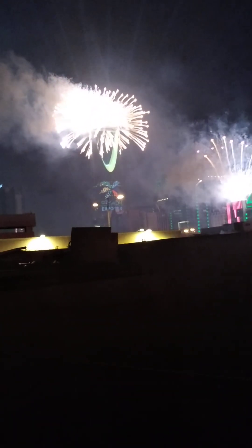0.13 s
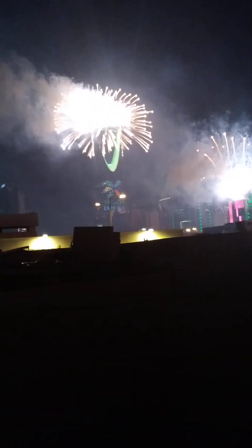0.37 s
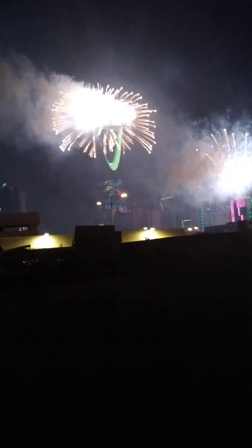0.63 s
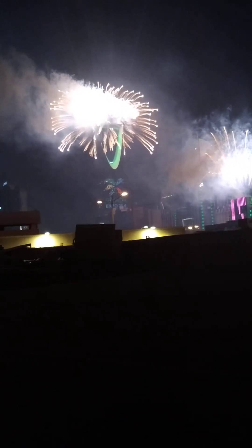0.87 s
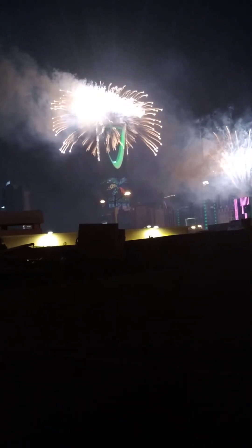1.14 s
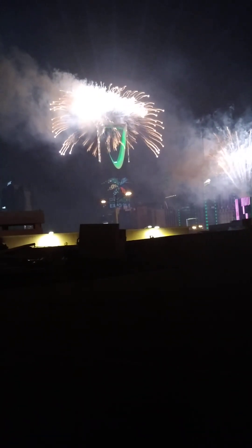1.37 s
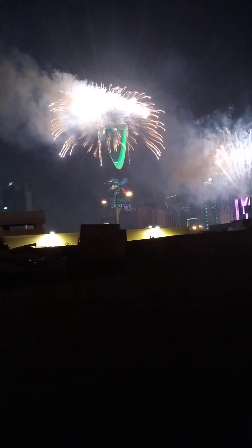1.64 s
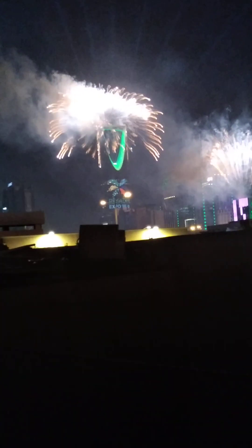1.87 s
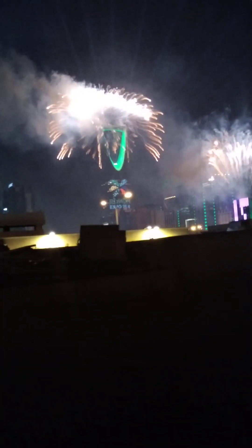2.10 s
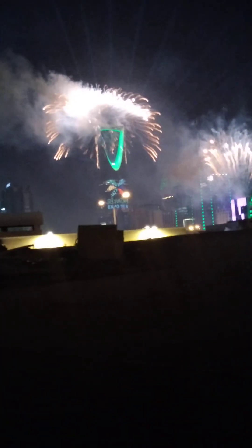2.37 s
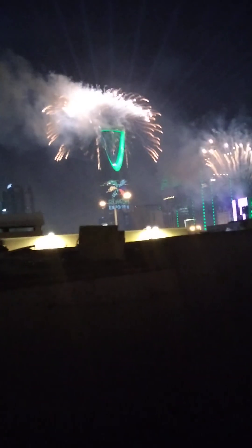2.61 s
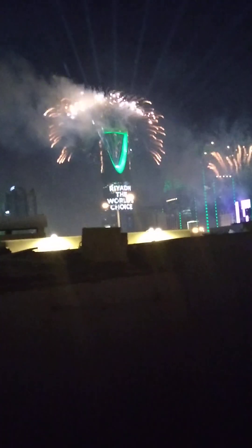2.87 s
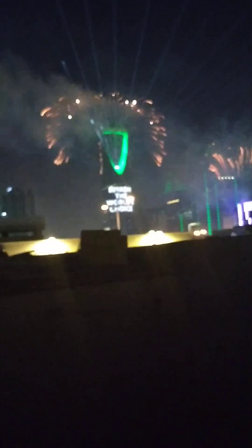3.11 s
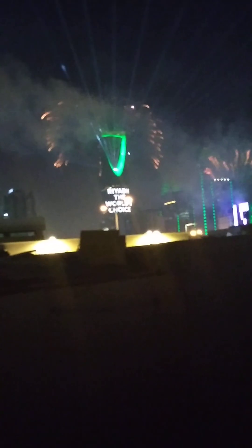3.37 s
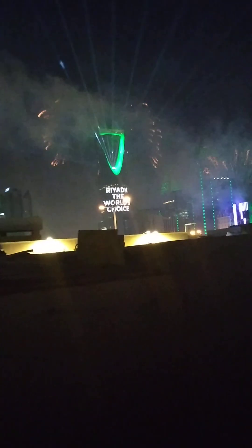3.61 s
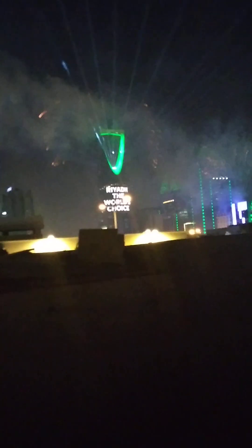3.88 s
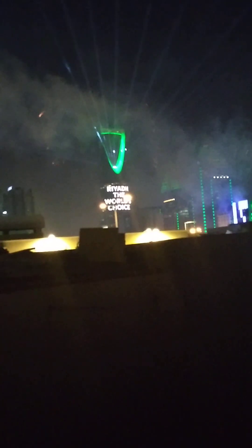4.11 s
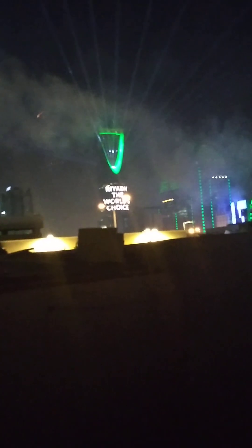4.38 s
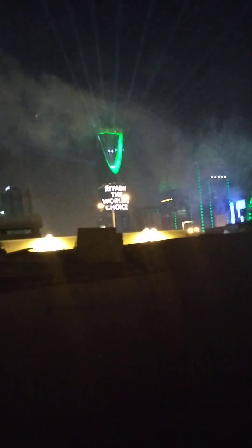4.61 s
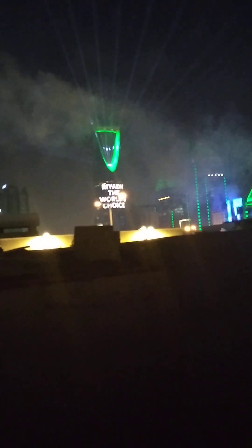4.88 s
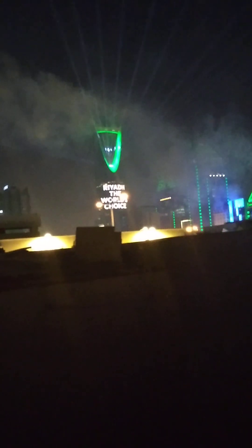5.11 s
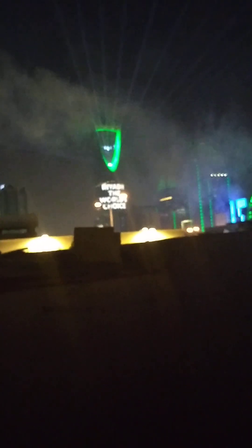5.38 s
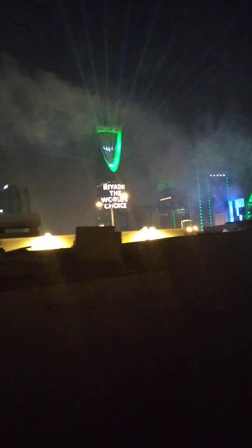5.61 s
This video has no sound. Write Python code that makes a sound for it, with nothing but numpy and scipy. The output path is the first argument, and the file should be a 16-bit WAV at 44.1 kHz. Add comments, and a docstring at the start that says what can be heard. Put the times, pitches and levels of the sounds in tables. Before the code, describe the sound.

Fireworks far away at night, heard by a stereo phone on a walled terrace above a city. From 0 s there is low rumble, faint patter and fine crackle; from about 0.35 s dull separate pops multiply. Between 1.0 and 1.4 s they merge into the loudest barrage, with deep bass thuds around 1.15 s and dry mid-pitched crackles. Strong irregular bursts continue until 2.0 s, then fall away to decaying rumble. A smaller volley rattles at 2.8-2.95 s, trailing sparse pops and crackle to about 3.4 s. At 3.65 s one tight, sharp bang lands, followed by low wall echoes. Afterwards the rumble fades into steady low traffic hum with sparse weak patter; a vehicle's broad tyre roar swells and peaks near 5.3 s. Treble is softened by distance, buildings give short diffuse echoes, thin microphone hiss stays throughout, and tiny close clicks occur near 0.2, 0.9 and 1.65 s.

```python
"""A walled roof terrace above a city at night: a phone hears a far fireworks display over the city's hum.
Each shell is one short pressure wave, dulled by a long way through the air. Volleys of small shells blur
into a rolling rumble; clusters of short rings make the crackle. Delayed copies stand for the terrace walls,
a decaying noise tail for far buildings; shaped noise makes boom, traffic, a passing vehicle and mic hiss."""
import sys
import numpy as np
from scipy import signal
from scipy.fft import rfft, irfft, next_fast_len
from scipy.io import wavfile
from scipy.ndimage import uniform_filter1d, map_coordinates

SR = 44100
rng = np.random.default_rng(int(sys.argv[2]) if len(sys.argv) > 2 else 0)


def waveform_to_disk(signal):
    """Save audio, clipped to [-1, 1], as 16-bit WAV at the path in sys.argv[1]."""
    frames = np.transpose(np.atleast_2d(signal))
    scaled = np.clip(frames, -1, 1) * 32767
    samples = np.round(scaled).astype(np.int16)
    wavfile.write(sys.argv[1], SR, samples)


def natural_amplitude(level_db):
    """Convert a level in decibels to a linear amplitude factor, elementwise."""
    exponent = np.asarray(level_db, float) / 20
    return 10 ** exponent


N = 253126
TIME_S = np.arange(N) / SR


def unit(x):
    """Scaled to rms 1."""
    return x / np.sqrt(np.mean(x ** 2) + 1e-20)


def along(points, hz):
    """Values of (f/Hz, value) points, interpolated on a log frequency axis."""
    f, v = np.transpose(points)
    return np.interp(np.log(hz + 1), np.log(f + 1), v)


def wobble(knots_per_s):
    """Smooth random curve through normally distributed knots."""
    knots = rng.standard_normal(int(N * knots_per_s / SR) + 4)
    return map_coordinates(knots, [np.arange(N) * knots_per_s / SR])


def hump(middle_s, half_s):
    """Gaussian swell, down to 1/e at half_s from its middle."""
    return np.exp(-((TIME_S - middle_s) / half_s) ** 2)


def filtered(x, response):
    """x times a complex frequency response; mirrored ends keep the edges free of clicks."""
    edge = SR // 4
    x = np.pad(x, [(0, 0)] * (x.ndim - 1) + [(edge, edge)], mode="reflect")
    m = next_fast_len(x.shape[-1])
    y = irfft(rfft(x, m) * response(np.fft.rfftfreq(m, 1 / SR)), m)
    return y[..., edge:edge + N]


def coloured(x, spectrum):
    """x through a (f/Hz, gain/dB) spectrum."""
    return filtered(x, lambda hz: natural_amplitude(along(spectrum, hz)))


def noise(spectrum):
    """Two unrelated channels of Gaussian noise through a spectrum."""
    return coloured(rng.standard_normal((2, N)), spectrum)


def spread(pair):
    """Two unrelated signals mixed so that the ports' likeness varies with frequency."""
    # left-right likeness: f/Hz, correlation
    alike = [(60, 0.99), (130, 0.97), (270, 0.96), (580, 0.79), (1220, 0.43), (2600, 0.14), (4500, 0.42)]

    def mid_side(hz):
        turn = np.arccos(np.clip(along(alike, hz), -1, 1)) / 2
        return np.array([np.cos(turn), np.sin(turn)])

    mid, side = filtered(pair, mid_side)
    return np.array([mid + side, mid - side])


def placed(s, shapes):
    """Rows of shapes summed, each centred on its time."""
    size = shapes.shape[1]
    at = np.round(s * SR).astype(int)[:, None] + np.arange(size)
    return np.bincount(at.ravel(), shapes.ravel(), N + 2 * size)[size // 2:size // 2 + N]


def waves(s, db, ms):
    """Pressure waves: a push, then a slightly deeper pull, about ms apart."""
    u = np.arange(-256, 256) / SR * 2000 / ms[:, None]
    return placed(s, -natural_amplitude(db)[:, None] * (u + 0.07) * np.exp(.5 - u * u / 2))


def rings(s, db, hz, ms, size=256):
    """Gaussian bursts of a few cycles, each with a random phase; ms: half length to 1/e."""
    t = np.arange(-size, size) / SR
    phase = 2 * np.pi * (hz[:, None] * t + rng.random((len(s), 1)))
    return placed(s, natural_amplitude(db)[:, None] * np.exp(-(t * 1000 / ms) ** 2) * np.sin(phase))


def shells():
    """Each wave comes weak and thin by the shorter way, then strong with a steep front."""
    # loudest shells, ahead of the air path: t/s, level/dB, push-to-pull time/ms
    bursts = [(0.3576, -19, 0.81), (0.4347, -16, 0.95), (0.5284, -13, 0.87), (0.5924, -15.5, 0.92),
              (.6666, -24, 0.74), (0.671, -18, 0.6), (0.6738, -15, 1), (0.6846, -23, 0.85),
              (.7, -28.5, 1.6), (0.7195, -22, 0.92), (0.7232, -17.5, 1.7), (0.776, -13, 1.06),
              (.815, -23.5, 1), (.8395, -19.5, .8), (0.842, -12.5, 0.76), (0.8804, -30, 1.7),
              (0.886, -20, 1.6), (0.9197, -15, 0.98), (0.9225, -15, 0.63), (0.9472, -21.5, 1.5),
              (.9505, -15, 0.81), (.9567, -16, 0.71), (.9652, -21, 1), (.974, -17.5, 1.5),
              (.998, -21.5, 1.6), (1.015, -10, 0.86), (1.0239, -13.5, 0.97), (1.039, -16, 1.2),
              (1.0446, -14.5, 0.89), (1.0484, -12.5, 0.82), (1.0512, -13.5, 0.89), (1.0542, -8, 0.62),
              (1.056, -17.5, 0.66), (1.0632, -21.5, 0.94), (1.0688, -14, 2.1), (1.0725, -21, 1.8),
              (1.0761, -16.5, 1.2), (1.089, -20.5, 1.1), (1.093, -16, 0.46), (1.103, -20, 0.81),
              (1.1115, -18, 0.9), (1.1212, -15.5, 1.2), (1.1312, -16, 0.51), (1.1324, -14.5, 0.8),
              (1.1397, -10, 0.87), (1.1504, -20.5, 0.62), (1.163, -20.5, 1), (1.1713, -18.5, 1.8),
              (1.181, -14.5, .88), (1.1864, -17.5, 2.2), (1.197, -21.5, 1.3), (1.218, -14.5, 0.79),
              (1.2205, -17.5, .8), (1.2427, -20.5, 0.5), (1.2501, -12.5, 0.78), (1.2586, -21, 2.1),
              (1.3164, -17, .7), (1.3233, -10, 0.7), (1.3669, -9.5, 0.77), (1.3613, -23, 0.79),
              (1.377, -22, 1.2), (1.3875, -16.5, 0.56), (1.3944, -13, 0.71), (1.428, -27.5, 2),
              (1.4555, -17, 1), (1.4597, -24, 1.2), (1.4957, -25, 1.6), (1.5, -14, 0.79),
              (1.5127, -28, .95), (1.5186, -24, 0.81), (1.5386, -16, 0.6), (1.5458, -25, 3.2),
              (1.5916, -21.5, 1.3), (1.6426, -25, 1.6), (1.635, -24, 1.2), (1.6643, -19, 1.3),
              (1.6685, -24, 1), (1.69, -17.5, 0.92), (1.6973, -15, .87), (1.7575, -17.5, 0.94),
              (1.7945, -12.5, 1.2), (1.8073, -25.5, 1.3), (1.8133, -26.5, 1.6), (1.8504, -15, 1.0),
              (1.853, -17, 1.35), (1.8667, -18, 0.57), (1.8771, -18, 0.67), (1.8848, -20.5, 1.1),
              (1.899, -27, 1.7), (1.9161, -20.5, 1.7), (1.9399, -17, 1.04), (1.9746, -16, 1.5),
              (2.004, -27.5, 1.1), (2.022, -37, 1.5), (2.7965, -23.5, 1.3), (2.7981, -20.5, 1.1),
              (2.8062, -26.5, 1.5), (2.8167, -18, 1.1), (2.8287, -20.5, 0.82), (2.8342, -24, 1),
              (2.8365, -16, 1.23), (2.8433, -32, 1.4), (2.8528, -22, 1.5), (2.8664, -20.5, 1.3),
              (2.8696, -16.5, 1.2), (2.875, -27, 1.8), (2.8808, -21, 0.72), (2.8835, -24.5, 0.98),
              (2.8941, -23, 2), (2.901, -23.5, 1.1), (2.9147, -35, 1.5), (2.9306, -24, 1.1),
              (2.9332, -16, 1.35), (2.9683, -32, 1.3), (2.9781, -24, 1.7), (3.021, -25, 0.65),
              (3.051, -29, 1.2), (3.062, -34, 0.53), (3.095, -26, 0.73), (3.117, -26.5, 1.9),
              (3.205, -30.5, 1.2), (3.2218, -23.5, 1.6), (3.253, -28.5, .8), (3.309, -35.5, 1.1),
              (3.362, -32, 0.89), (3.653, -24.5, 1), (3.642, -29, 0.61), (3.6456, -28, 1.6),
              (3.6549, -22.5, 1.7), (3.657, -29.5, 2.2), (3.662, -15.5, 1.3), (3.6607, -20, 0.83),
              (3.666, -18, 2.7), (3.6669, -20.5, 0.63), (3.6713, -17.5, 0.73), (3.6735, -20.5, 1.5),
              (3.6757, -19.5, 0.64), (3.679, -23.5, 2.3), (3.683, -25.5, 1.3), (3.695, -33, 2.2),
              (3.7572, -31, 0.87), (3.7719, -30.5, 1.9)]
    s, db, ms = np.transpose(bursts)
    early_lead_s, early_db, early_thin = 0.00702, -17, 0.52  # level re main wave, wave time share
    front_db, front_thin = -12.5, 0.5
    early = waves(s - early_lead_s, db + early_db, early_thin * ms)
    front = waves(s - ms / 2000, db + front_db, front_thin * ms)
    return waves(s, db, ms) + early + front


def salvo(count=54):
    """Waves packed so close that they merge into one bang; the middle ones tend to be largest and longest."""
    # one salvo: first t/s, fullest t/s, last t/s
    span = (3.639, 3.664, 3.693)
    first, fullest, last = span
    draw = rng.random((count, 3))
    s = first + (last - first) * (np.arange(count) + draw[:, 0]) / count
    swell = np.interp(s, [first, fullest, last], [.3, 1, .3])
    ms = 0.22 * (2.8 + 3.1 * swell) ** draw[:, 2]
    top_db = -25
    return waves(s, top_db + 20 * np.log10(swell) - 5 * draw[:, 1], ms)


def barrage_db():
    """Level curve of the small shells' fire, interpolated in dB."""
    # patter of small shells, ahead of the air path: t/s, level/dB
    barrage = [(0, -41.5), (.45, -37.5), (.98, -35), (1.05, -32), (1.25, -31), (1.35, -33), (1.97, -32),
               (2.06, -41), (2.25, -41.5), (2.55, -48), (2.785, -41), (2.8, -34), (2.92, -39.5), (3.1, -38),
               (3.25, -44), (3.63, -41), (3.67, -31), (3.7, -43.5), (3.77, -42.5), (3.9, -43), (4.6, -53.5),
               (5.1, -43.5), (5.45, -43), (5.74, -42.5)]
    s, db = np.transpose(barrage)
    return np.interp(TIME_S, s, db)


def patter(level_db, count=2200):
    """Small shells: waves at random moments, a few much larger than the rest."""
    draw = rng.random((count, 3))
    db = -2.5 * np.log(1 - draw[:, 1])
    ms = 0.95 * (0.57 + 1.18 * draw[:, 2])
    return natural_amplitude(level_db) * unit(waves(draw[:, 0] * N / SR, db, ms))


def cracks(count=5):
    """Bursting stars: each crack is a quick cluster of snaps, scattered in time, pitch and size."""
    # clearest cracks: t/s, level/dB (a snap's mean is lower, below), f/Hz
    bursting_stars = [(0.253, -29.5, 1120), (0.263, -35.5, 2330), (.331, -34.5, 1010), (0.358, -28.5, 1490),
                      (.362, -36.5, 2160), (.437, -38.5, 1150), (.459, -33.5, 2120), (.464, -29.5, 2110),
                      (.528, -35, 1940), (.562, -34, 2000), (0.579, -35.5, 1230), (.58, -44, 1960),
                      (.621, -36, 2370), (0.638, -33, 1380), (0.673, -31, 1380), (0.773, -41, 1090),
                      (.722, -35, 1640), (.841, -38, 2130), (0.844, -32.5, 1550), (0.886, -30, 1390),
                      (.922, -24, 1215), (.982, -34.5, 1920), (1.024, -32, 1470), (1.04, -26.5, 1210),
                      (1.056, -32, 804), (1.056, -39, 2480), (1.095, -30, 1580), (1.133, -20, 1180),
                      (1.182, -32, 2100), (1.181, -23, 1250), (1.219, -23.5, 1150), (1.244, -28, 1210),
                      (1.111, -35, 1500), (1.15, -37.5, 1390), (1.244, -39, 1990), (1.282, -33, 2000),
                      (1.352, -40.5, 1920), (1.39, -39, 2010), (1.479, -38, 2300), (1.538, -37, 1800),
                      (1.332, -26, 1200), (1.422, -32.5, 1530), (1.477, -31, 1420), (1.498, -24.5, 1370),
                      (1.523, -25, 1240), (1.592, -30, 1180), (1.61, -33.5, 1550), (1.664, -40, 1920),
                      (1.695, -27.5, 1350), (1.854, -30.5, 1290), (1.866, -32, 1390), (1.885, -31, 1220),
                      (1.897, -32, 1230), (1.911, -35, 2030), (1.917, -41, 2030), (1.941, -37, 1410),
                      (1.975, -38, 1420), (2.003, -40, 1500), (2.794, -33, 1500), (2.794, -42, 2090),
                      (2.818, -40, 1400), (2.849, -42, 1300), (2.884, -37, 1400), (2.9, -34.5, 1300),
                      (2.836, -28, 1270), (2.874, -30.5, 1330), (2.932, -26, 1440), (2.9, -29, 850),
                      (2.955, -35.5, 950), (3.02, -39, 1950), (3.024, -35, 1310), (3.065, -37, 1500),
                      (3.094, -34, 1300), (3.094, -33, 820), (3.262, -41, 1400), (3.31, -39, 1250),
                      (3.654, -35, 1200), (3.665, -31, 1410), (3.673, -35, 1950), (3.364, -35, 1220),
                      (3.054, -45, 1880), (3.25, -32, 1220), (3.309, -41.5, 1880), (5.378, -33, 1050)]
    s, db, hz = (np.repeat(column, count) for column in np.transpose(bursting_stars))
    span_s, pitch_scatter, snap_db, snap_scatter_db, snap_ms = .0025, 0.058, -5, 1.67, 1.63
    draw = rng.standard_normal((len(s), 3))
    s = s + span_s * draw[:, 0]
    hz = hz * np.exp(pitch_scatter * draw[:, 1])
    return rings(s, db + snap_db + snap_scatter_db * draw[:, 2], hz, snap_ms)


def stars(count=6000):
    """Random crackle of rms 1: short rings at 700-3500 Hz, a few much larger than the rest."""
    # crackle colour: f/Hz, gain/dB
    crackle_colour = [(300, -120), (700, -20), (1200, 3), (1600, -9.5), (2000, -1), (2500, -6),
                      (2800, -15.5), (3500, -14), (4200, -30.5), (5000, -120)]
    draw = rng.random((count, 3))
    db = -1.64 * np.log(1 - draw[:, 1])
    grains = rings(draw[:, 0] * N / SR, db, 700 * 5 ** draw[:, 2], ms=0.91)
    return unit(coloured(grains, crackle_colour))


def crackle(level_db, reports):
    """Star crackle follows the patter and its own showers, hardest around each report."""
    # showers of stars, ahead of the flare gain: middle t/s, half length/s, level/dB
    star_showers = [(.2, 0.31, -47), (.6, 0.16, -51), (1.374, 0.083, -53.5), (1.92, 0.045, -54),
                    (3.17, 0.11, -66), (3.76, 0.018, -69)]
    showers = sum(natural_amplitude(db) * hump(s, half_s) for s, half_s, db in star_showers)
    flare = uniform_filter1d(np.abs(reports), size=500)
    flare = flare / (uniform_filter1d(flare, size=8000) + .004)  # re its slower average
    under_patter_db = -12
    return (natural_amplitude(level_db + under_patter_db) + showers) * (0.67 + 0.28 * flare) * stars()


def rolls():
    """Bass envelope: each roll swells fast and dies slowly over a steady rumble; powers add."""
    # rolls of the big charges: fullest t/s, level/dB
    charges = [(.3, -40), (.5, -46.5), (.8, -43.5), (1.14, -33), (1.47, -40), (1.65, -44), (1.85, -40.5),
               (2.25, -43), (2.7, -41), (2.92, -44.5), (3.25, -50), (3.67, -49)]
    rise_s, t60_s, rumble_db = 0.13, 3.1, -47
    power = natural_amplitude(rumble_db) ** 2
    for s, db in charges:
        before_s = np.clip(s - TIME_S, 0, None)
        after_s = np.clip(TIME_S - s, 0, None)
        power = power + natural_amplitude(db - 60 * after_s / t60_s) ** 2 * np.exp(-(before_s / rise_s) ** 2)
    return np.sqrt(power)


def boom():
    """Big charges: bass noise from all round under the envelope of the rolls."""
    # boom colour: f/Hz, relative level/dB
    bass = [(20, -35.5), (62, -12.5), (90, -2.5), (150, -3), (220, -7), (400, -36.5), (900, -120)]
    return rolls() * spread(unit(noise(bass)))


def thuds():
    """Thrown back by large walls: a few low cycles that swell and fade."""
    # deep thuds: t/s, level/dB, f/Hz
    wall_thuds = [(1.149, -28, 105), (1.202, -34.5, 86.6), (3.68, -31, 174), (3.72, -32, 88),
                  (3.765, -30, 220), (3.789, -32.5, 80), (4.749, -40, 45.7)]
    s, db, hz = np.transpose(wall_thuds)
    half_cycles = 2.85  # half length to 1/e
    return rings(s, db, hz, 1000 * half_cycles / hz[:, None], size=6000)


def air(x):
    """The long way through the air takes the treble, the phone cuts the bass."""
    # net response: f/Hz, gain/dB
    loss = [(8, -37.5), (40, -12.5), (100, -4.5), (220, -3), (340, -2), (600, 2), (780, -2.5), (1000, 2),
            (1400, 6), (2500, -9), (3100, -11), (5000, -62.5), (9000, -120)]
    return coloured(x, loss)


def terrace(x):
    """Floor and walls: each port hears its own sum of delayed copies."""
    # paths to the left port: delay/ms, gain
    left = [(.09, 1), (1.8, -.2), (2.9, -.22), (3.6, .2), (5.1, .18), (5.9, -.12), (13.4, .1), (16.2, -.16),
            (17.1, .14), (21.4, .1), (23.8, .14)]
    # paths to the right port: delay/ms, gain
    right = [(0, 1), (1.5, -.25), (2.8, .12), (3.3, -.14), (3.9, .17), (5.1, .12), (8, -.1), (13.4, .1),
             (16.3, -.13), (17.2, .14), (18.2, .14), (18.9, -.13), (21.4, .14)]

    def copies(paths, hz):
        return sum(g * np.exp(-2j * np.pi * hz * ms / 1000) for ms, g in paths)

    return filtered(x, lambda hz: np.array([copies(left, hz), copies(right, hz)]))


def town(x):
    """Far buildings answer with a noise tail in which each frequency dies at its own speed."""
    # decay of the answer: f/Hz, t60/s
    decay = [(100, 0.93), (500, 0.74), (1500, 0.98), (3000, 0.53)]
    hz, t, z = signal.stft(rng.standard_normal((2, SR)), SR, nperseg=256)
    tail = signal.istft(z * natural_amplitude(-60 * t / along(decay, hz)[:, None]), SR, nperseg=256)[1]
    tail = tail / np.linalg.norm(tail[0])
    late = np.pad(x, (1200, 0))[None]  # 27 ms
    return spread(signal.fftconvolve(late, tail, axes=1)[:, :N])


def ticks():
    """Small dry clicks close to the phone: a brief 5500 Hz ring, fast rise, t60 20 ms."""
    # clicks: t/s, level of the decay at its start/dB
    clicks = [(.2, -62), (.89, -52), (1.644, -52)]
    s, db = np.transpose(clicks)
    t = np.clip(np.arange(-512, 512), 0, None) / SR
    envelope = natural_amplitude(db[:, None] - 60 * t / .02) * (1 - np.exp(-t / .0006))
    return placed(s, envelope * np.sin(2 * np.pi * 5500 * t))


def passing_vehicle():
    """Tyre roar on the road below: shaped noise that swells and fades once."""
    # pass: nearest t/s, half length/s, level/dB
    vehicle_pass = (5.3, .48, -40.5)
    # roar: f/Hz, relative level/dB per Hz
    tyres = [(120, -120), (250, -10), (350, 5), (480, -1.5), (650, -1), (1100, -7.5), (1500, -14),
             (2200, -34), (4000, -120)]
    nearest_s, half_s, db = vehicle_pass
    return natural_amplitude(db) * hump(nearest_s, half_s) * unit(spread(noise(tyres)))


def traffic():
    """Far traffic hum: shaped noise, faintly patchy in time and frequency."""
    # hum: f/Hz, relative level/dB per Hz
    hum = [(15, -0.5), (28, 4), (48, 3.5), (62, 0), (110, 1), (170, -7.5), (250, -10.5), (340, 2.5),
           (420, -13), (670, -7), (1100, -11.5), (1600, -17.5), (2200, -22.5), (2650, -23), (3000, -31.5),
           (4300, -36), (6000, -120)]
    z = signal.stft(rng.standard_normal((2, N)), nperseg=512)[2]
    field = uniform_filter1d(rng.standard_normal(z.shape[1:]), 8, 0)
    patches_db = unit(uniform_filter1d(field, 10, 1))  # 1 dB rms
    pair = signal.istft(z * natural_amplitude(patches_db), nperseg=512)[1][:, :N]
    return natural_amplitude(-39.5) * unit(spread(coloured(pair, hum)))


def city():
    """Road sound reaches the left port first."""
    lead_ms = .09

    def lead(hz):
        return np.exp(1j * np.pi * np.outer([1, -1], hz) * lead_ms / 1000)

    return filtered(traffic() + passing_vehicle(), lead)


def hiss():
    """Thin microphone hiss of the phone, its level wavering slightly."""
    # hiss: f/Hz, relative level/dB per Hz
    mic_hiss = [(2000, -20), (3000, 1.5), (4200, -2), (4700, -8.5), (5500, -8), (7500, -12), (8300, -16),
                (9200, -16.5), (10400, -24), (11500, -33.5), (15700, -40)]
    return natural_amplitude(-62 + 0.66 * wobble(12)) * unit(noise(mic_hiss))


def scene():
    """Waves cross the air, then the terrace; boom and city come from all round."""
    reports = shells()
    level_db = barrage_db()
    bangs = air(reports + salvo() + patter(level_db))
    far = bangs + cracks() + crackle(level_db, reports)
    display = terrace(far) + natural_amplitude(-9.5) * town(far) + boom() + thuds()
    return display + ticks() + city() + hiss()


def top_cut(x):
    """Nothing passes above the cut-off."""
    return signal.sosfilt(signal.butter(12, 15720, fs=SR, output="sos"), x)


def record(dry):
    """The phone's two ports differ in colour."""
    # port difference: f/Hz, left minus right/dB
    tilt = [(60, 0.8), (300, 0.5), (600, 1.3), (1000, 0.5), (2000, 1.5), (4000, 5), (6000, 5), (8000, 0),
            (12000, -5)]
    ports = filtered(dry, lambda hz: natural_amplitude(np.outer([.5, -.5], along(tilt, hz))))
    return top_cut(ports)


dry = scene()
out = record(dry)
waveform_to_disk(out)
```